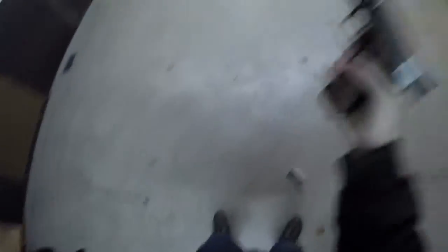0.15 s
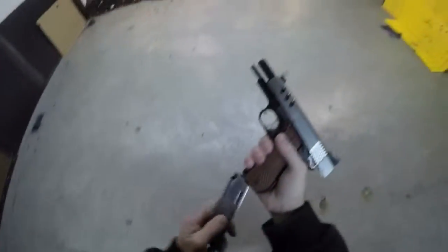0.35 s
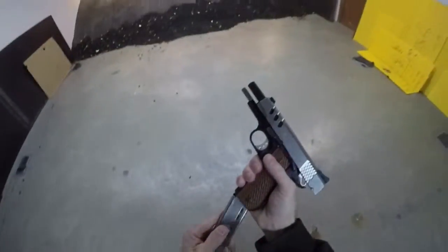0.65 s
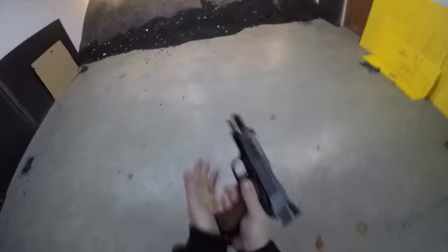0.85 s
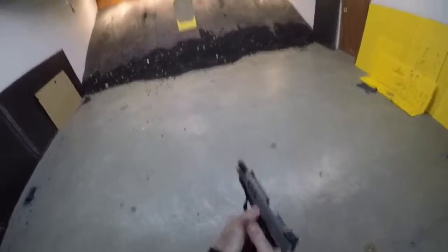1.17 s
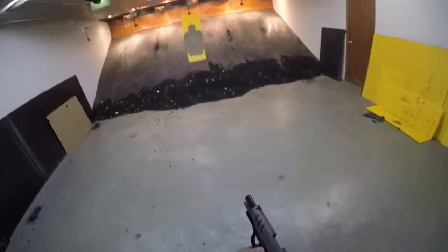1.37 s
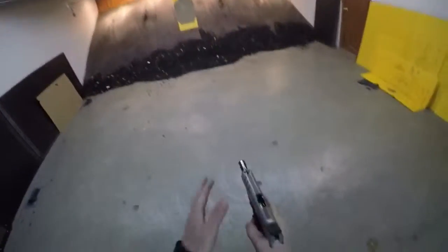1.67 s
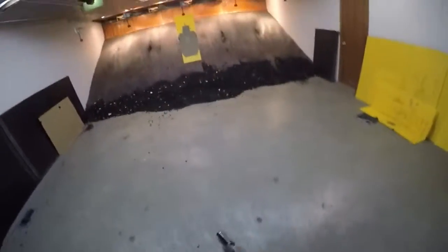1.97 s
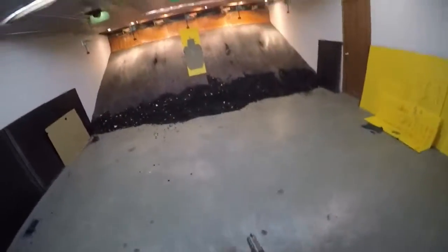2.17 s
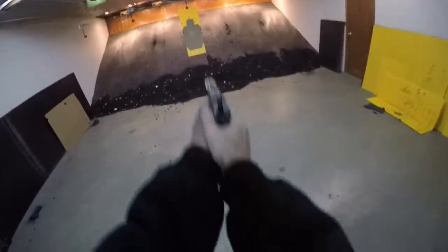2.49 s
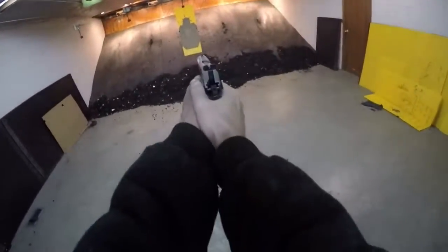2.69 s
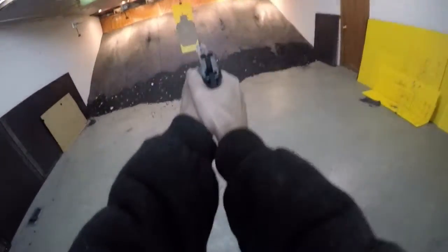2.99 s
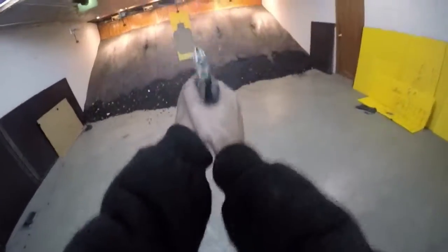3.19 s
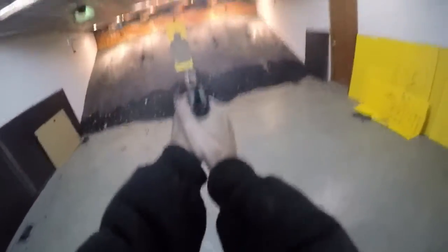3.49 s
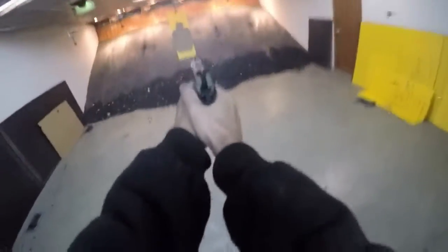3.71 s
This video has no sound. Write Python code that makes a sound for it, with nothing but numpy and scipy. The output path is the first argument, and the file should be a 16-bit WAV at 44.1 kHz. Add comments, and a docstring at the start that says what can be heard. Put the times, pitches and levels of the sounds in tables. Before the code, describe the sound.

Four loud pistol shots boom and echo in an indoor range after a clattering reload

```python
"""Concrete indoor range, microphone at the shooter's head: a pistol is reloaded and fired four times.
Background: duct rumble, air rush and fan lines under a written level curve that ducks at the first shot.
An empty magazine clatters on the floor, mostly heard through the room; close by, a full one is slapped
home and the slide slams shut: noise bursts through resonances, plus fading modes. A spent case rings faintly.
Each shot is a noise crack and a pressure wave that overload the microphone, then the same wall echoes."""
import sys
import numpy as np
from scipy import signal
from scipy.fft import rfft, irfft, next_fast_len
from scipy.io import wavfile
from scipy.ndimage import map_coordinates

SR = 44100
rng = np.random.default_rng(int(sys.argv[2]) if len(sys.argv) > 2 else 0)


def int16_out(signal):
    """Quantize to a 16-bit WAV file."""
    q = np.round(np.clip(np.atleast_2d(signal).T, -1, 1) * 32767)
    wavfile.write(sys.argv[1], SR, q.astype(np.int16))


N = 169785

# Background level as the recorder's automatic gain rises, then ducks at the first shot,
# written as a level curve: [t/s, rumble level/dB, air rush level/dB]
BACKGROUND_LEVELS = [(0, -51.5, -62.5), (.3, -52.5, -66.5), (.6, -43.5, -57.5), (1, -39, -51),
                     (1.5, -36.5, -50.5), (2.1, -36, -50.5), (2.7, -36.5, -51.5), (2.93, -36, -50.5),
                     (2.97, -70, -99.5), (3.85, -61, -48)]
# Colour of the duct rumble, then of the air rush: [f/Hz, relative level/dB]
RUMBLE_SPECTRUM = [(12, -30.5), (20, 0.5), (59, 2), (92, -10), (124, -7), (169, -10), (260, -32.5),
                   (340, -58.5), (570, -120)]
AIR_SPECTRUM = [(140, -37.5), (230, -5), (344, -5), (488, -5), (523, -14.5), (838, -22), (1320, -25),
                (1490, -26.5), (7450, -39.5), (8280, -39), (8720, -42.5), (15000, -47)]
# Steady fan lines: [f/Hz, level over the air rush/dB]
FAN_LINES = [(123.8, -3), (403.7, -15.5), (484.5, -3.5)]
FAN_WAVER_RATE, FAN_WAVER = 4, .25  # knots a second, depth

# Spent case rolling on the floor: [t/s, lower mode level/dB, upper mode level/dB]
CASE_LEVELS = [(0, -96, -92), (.1, -90, -88), (.43, -78, -80), (.49, -67, -60), (.54, -76, -74),
               (.645, -88, -83), (.67, -48, -69), (.72, -50.5, -60), (.82, -56, -64), (.87, -79, -77.5),
               (1.24, -93, -73.5), (1.334, -59, -81), (1.44, -76, -72), (1.528, -56, -77),
               (1.7, -65.5, -75), (1.85, -89, -100)]
# The two modes of the case: [f/Hz], lower and upper
CASE_MODES_HZ = [7994, 11950]
CASE_WAVER_RATE, CASE_WAVER = 30, .5  # knots a second, depth

# Empty magazine bouncing on the floor:
# [t/s, level/dB, t60/s, tilt/dB per octave, room level relative to the contact/dB]
MAGAZINE_BOUNCES = [(.136, -32.5, 0.13, 4.5, 3), (.143, -28, .03, 5.5, 3), (.152, -30, 0.063, -.5, 3),
                    (.159, -23, 0.026, -0.5, -3), (.200, -34, .03, -4.5, 1), (.276, -29.5, 0.031, 0, 2),
                    (.293, -27.5, .025, -.5, 2), (.299, -28, .02, -.5, 2.5), (.310, -29.5, .03, -.5, 4)]
# Resonances of the hollow steel box: [f/Hz, relative level/dB]
MAGAZINE_SPECTRUM = [(150, -12.5), (380, -8), (800, -26), (1500, -14.5), (2100, -9), (2500, 2),
                     (2850, -0.5), (3300, -12), (4300, -8), (4900, -3), (6200, -18.5), (11000, -21.5),
                     (13500, -14), (15000, -20.5)]
# Ringing modes of the box: [f/Hz, relative level/dB, t60/s]
MAGAZINE_MODES = [(2500, -1, 0.47), (2778, -9.5, 0.471), (4775, -9, .45), (5190, -10, .4)]
MAGAZINE_RING_DB = -12.5  # relative to each bounce

# Steel contacts in the gun, then the full magazine driven home; columns as for the bounces:
# [t/s, level/dB, t60/s, tilt/dB per octave, room level relative to the contact/dB]
GUN_CLICKS = [(.035, -48.5, .01, 3, -1), (.039, -57, .02, 4, -2), (.0615, -41.5, 0.01, -6, -1),
              (.074, -48, 0.023, 7, -5), (.4285, -26.5, 0.019, 0.5, -3), (.6112, -19, .012, -0.5, -7.5),
              (.6124, -21, 0.0075, -2, -4), (.6175, -40, .015, 5, -7.5), (.667, -36.5, .02, -3, 0),
              (.790, -46, 0.032, -4.5, -10.5), (.810, -34.5, 0.013, -4.5, -1), (.850, -44.5, 0.1, -3, -1.5),
              (.8566, -37.5, .03, -2, 0), (.8615, -31.5, 0.035, -6.5, 1), (.880, -18.5, 0.028, 2, 6.5),
              (1.268, -48.5, .03, 2.5, 6.5), (1.392, -50, 0.033, 5, 4), (1.514, -40, 0.024, -3, -1),
              (1.545, -48.5, .03, -4.5, -4), (1.926, -46.5, .04, -4, 5.5), (1.968, -46.5, .04, -5.5, 3.5),
              (2.003, -30.5, .015, -0.5, -16), (2.0116, -11, 0.016, 1, -3.5), (2.018, -23, 0.017, 3, -1.5),
              (2.033, -29.5, 0.031, 2.5, -2.5), (2.047, -30, 0.028, 12, -9.5),
              (2.106, -20, 0.095, -0.5, -4), (2.113, -16, .012, -1, 1), (2.1178, -11.5, 0.043, 1, -22),
              (2.1265, -9.5, 0.036, 7, -1.5), (2.1295, -5.5, 0.015, -2, -1), (2.132, -12.5, 0.033, 10, 1.5)]
MAGAZINE_SEATING = [(0.8927, -3, .016, 0, -11.5), (0.8944, -3, 0.017, 0, -10.5),
                    (.8995, -15.5, .02, 0.92, -5)]
# Resonances of the gun's steel, then of the grip: [f/Hz, relative level/dB]
STEEL_SPECTRUM = [(100, -18), (250, -1.5), (400, 3), (600, -10), (1200, -4.5), (1700, -2.5), (2250, 4.5),
                  (2900, 4), (3500, -3.5), (4700, 5), (5800, -2), (7000, -13.5), (8300, -12.5),
                  (10500, -22), (12500, -20), (15000, -22)]
GRIP_SPECTRUM = [(60, -0.5), (250, -13), (600, -30), (1150, -11.5), (1550, -33.5), (2200, -2.5),
                 (2750, -4.5), (3400, -14), (4100, -8.5), (4600, 3), (5300, -3), (6200, -11.5),
                 (7000, -21.5), (10500, -29.5), (15000, -23)]
# Modes of the frame as the magazine seats, then of the slide: [f/Hz, relative level/dB, t60/s]
FRAME_MODES = [(1803, 18, 0.11), (2218, -12, 0.49), (3580, -7, 0.36), (3957, -1, 0.36), (4414, -15.5, 0.36),
               (5184, -7, 0.26), (7790, -17, 0.99)]
SLIDE_MODES = [(2030, -4.5, .6), (2160, -1.5, 0.53), (2545, -7, 0.52), (4587, -12, .25), (6718, -5, .25),
               (9700, -14, .3)]
FRAME_RING_DB = -44.5
SLIDE_SHUT_S, SLIDE_RING_DB = 2.13, -28.5
# Dull knocks of the gun in the hand: [t/s, level/dB, f/Hz, t60/s]
HAND_KNOCKS = [(.4285, -34.5, 1150, 0.021), (.634, -37.5, 410, .15), (.8928, -24.5, 70, 0.081),
               (2.1295, -22, 391, 0.078)]

# The range's answer to small sounds: [f/Hz, relative level/dB, t60/s]
SMALL_SOUND_ROOM = [(100, -17, 0.47), (400, -2, .9), (1000, -2, 0.67), (2400, 2.5, 0.57), (5230, 1, 0.5),
                    (9000, 8.5, 0.41), (15000, 0.5, 0.55)]
ROOM_RISE_S = 0.0027
BOUNCE_S, BOUNCE_DB = .0062, -19  # one return from the nearest surface
CLUSTER_DB, CLUSTER_RATE = 1, 250  # scale of the reflections' level wander, knots a second

# The shots: [t/s, level/dB, extra pressure wave level/dB, extra crack level/dB]
SHOTS = [(2.9498, 3.5, 1.5, 13), (3.2226, -0.5, -1, 5), (3.4288, -1.5, -3, 1.5), (3.6018, 0.5, -4, -0.5)]
# Colour of the crack: [f/Hz, relative level/dB]
CRACK_SPECTRUM = [(200, 4.5), (1200, -6), (2400, 3.5), (3600, -7), (5500, -10.5), (8000, -19), (15000, -38)]
CRACK_DB, CRACK_WIDTH_S = -3.5, 0.00054
CRACK_ECHO_S, CRACK_ECHO_DB = 0.0043, -9
PUSH_DB, PUSH_AT_S, PUSH_WIDTH_S = 1.5, .0036, .0014
SUCTION_DB, SUCTION_AT_S, SUCTION_RISE_S = -3.5, .0066, .0033
# The hall's answer to a shot, then that of the near walls and ceiling: [f/Hz, relative level/dB, t60/s]
HALL_TAIL = [(30, -15.5, 0.32), (110, -7.5, .9), (179, -12.5, 0.54), (218, 0.5, 0.68), (254, -4.5, 0.76),
             (297, 0.5, 1.1), (358, -2, 1.33), (459, 1, 1.1), (534, -8.5, 1.5), (560, -5, 1),
             (700, -6, 0.55), (1010, -7, 0.76), (1390, -8, 0.61), (2690, -12, 0.53), (3500, -23, 0.57),
             (4660, -16.5, 0.52), (6600, -26.5, 0.44), (9900, -33, 0.42), (15000, -32, 0.39)]
NEAR_SCATTER = [(60, 1, 0.096), (156, -0.5, 0.2), (250, 2, .15), (504, -13.5, 0.29), (895, 5.5, 0.05),
                (1390, 6, 0.096), (2630, -9.5, 0.095), (5000, -17, 0.22), (8750, -32, 0.041),
                (15000, -39, 0.075)]
HALL_DB, HALL_RISE_S = -15.5, 0.002
SCATTER_DB, SCATTER_AT_S = -12.5, 0.011
# Standing waves between the walls: [f/Hz, level relative to the shot/dB, t60/s]
STANDING_WAVES = [(229.7, -26.5, 0.97), (342.3, -22.5, 0.74), (365.45, -21.5, 0.95), (404.3, -20.5, 0.74)]
STANDING_RISE_S = .03
# Booming echoes from the walls and the backstop: [delay t/s, level relative to the shot/dB]
WALL_ECHOES = [(0.0301, -13), (0.0525, -9), (.0739, -7.5), (0.107, -40)]
ECHO_HZ, ECHO_WIDTH_S = 367.4, 0.0017
ECHO_WAVE_DB = -20  # part of the pressure wave that each echo carries back
FLOOR_LAG_S, FLOOR_LOSS_DB = .0054, 2.5  # second, weaker arrival of each echo

CLIP_TOP, CLIP_HARDNESS = 1, 2.8
LOW_CUT_HZ, TOP_HZ = 8, 15350


def amp(db):
    """Amplitude factor of a level in dB."""
    return 10 ** (np.asarray(db) / 20)


def unit(x):
    """Scale to rms 1."""
    return x / np.sqrt(np.mean(x ** 2) + 1e-20)


def clock():
    """Time of every sample in seconds."""
    return np.arange(N) / SR


def along(points, hz):
    """Read (Hz, value) points on a log frequency axis."""
    f, values = np.transpose(points)
    return np.interp(np.log(hz + 1), np.log(f + 1), values)


def bell(t, width):
    """Gaussian pulse around t = 0."""
    return np.exp(-.5 * (t / width) ** 2)


def add(track, s, x):
    """Mix x into the track from time s on."""
    i = int(round(s * SR))
    track[i:i + len(x)] += x[:N - i]


def wobble(rate, size):
    """A smooth random curve through `rate` random knots a second."""
    knots = rng.standard_normal(int(size * rate / SR) + 4)
    return map_coordinates(knots, [np.arange(size) * rate / SR])


def noise(spectrum):
    """Coloured noise of rms 1."""
    size = next_fast_len(N)
    gain = amp(along(spectrum, np.fft.rfftfreq(size, 1 / SR)))
    return unit(irfft(rfft(rng.standard_normal(size)) * gain, size)[:N])


def tone(hz, rate, waver):
    """A line of rms 1 that wavers in level and phase."""
    phase = 2 * np.pi * hz * clock()
    in_phase = (1 + waver * wobble(rate, N)) * np.sin(phase)
    quadrature = waver * wobble(rate, N) * np.cos(phase)
    return unit(in_phase + quadrature)


def burst(envelope, count=6):
    """Noise under an envelope, its spectrum evened out by repeated flattening."""
    x = rng.standard_normal(len(envelope)) * envelope
    for _ in range(count):
        flat = irfft(np.exp(1j * np.angle(rfft(x))))
        x = np.sign(flat) * envelope
    return x


def ring(modes):
    """One second of struck modes, each a sine fading by 60 dB in its t60."""
    t = np.arange(SR) / SR
    return sum(amp(db - 60 * t / t60) * np.sin(2 * np.pi * hz * t) for hz, db, t60 in modes)


def body(spectrum, tilt=0, size=2048):
    """Causal impulse response of energy 1 with this spectrum, tilted above size / 2 Hz."""
    hz = np.fft.rfftfreq(size, 1 / SR)
    level = along(spectrum, hz) + tilt * np.log2(np.maximum(hz, size / 2))
    # Folding the cepstrum onto positive times gives minimum phase
    cepstrum = irfft(np.log(amp(level)))
    cepstrum[1:size // 2] *= 2
    cepstrum[size // 2:] = 0
    response = irfft(np.exp(rfft(cepstrum)))
    return response / np.linalg.norm(response)


def tail(table, size=512):
    """One second of clustered reflections, each frequency dying at its own speed."""
    table = np.array(table)
    white = irfft(np.exp(2j * np.pi * rng.random(SR // 2 + 1)))
    clusters = unit(white * amp(CLUSTER_DB * wobble(CLUSTER_RATE, SR)))
    hz, t, bins = signal.stft(clusters, SR, nperseg=size)
    t60 = along(table[:, ::2], hz)[:, None]
    fading = signal.istft(bins * amp(-60 * t / t60), SR, nperseg=size)[1]
    return signal.fftconvolve(fading, body(table[:, :2]))[:SR]


def contacts(rows, spectrum, size=4096):
    """Each contact is a short rattle through the part's resonances, with one bounce and a room tail."""
    out, t = np.zeros(N), np.arange(SR) / SR
    for s, db, t60, tilt, room_db in rows:
        rattle = burst(amp(-60 * t[:size] / t60))
        room = tail(SMALL_SOUND_ROOM) * (1 - np.exp(-t / ROOM_RISE_S))
        # The room's energy is set against the rattle's
        paths = amp(room_db) * room * np.linalg.norm(rattle) / np.linalg.norm(room)
        add(paths, 0, rattle)
        add(paths, BOUNCE_S, amp(BOUNCE_DB) * rattle)
        add(out, s, amp(db) * signal.fftconvolve(paths, body(spectrum, tilt)))
    return out


def ventilation():
    """Duct rumble, rushing air and wavering fan lines, under the written background level curve."""
    s, *levels = np.transpose(BACKGROUND_LEVELS)
    rumble_gain, air_gain = [amp(np.interp(clock(), s, db)) for db in levels]
    fan = sum(amp(db) * tone(hz, FAN_WAVER_RATE, FAN_WAVER) for hz, db in FAN_LINES)
    return rumble_gain * noise(RUMBLE_SPECTRUM) + air_gain * (noise(AIR_SPECTRUM) + fan)


def spent_case():
    """A brass case sings in two wavering modes as it rolls."""
    s, *levels = np.transpose(CASE_LEVELS)
    out = np.zeros(N)
    for hz, db in zip(CASE_MODES_HZ, levels):
        out += amp(np.interp(clock(), s, db)) * tone(hz, CASE_WAVER_RATE, CASE_WAVER)
    return out


def dropped_magazine():
    """The hollow steel box clatters and rings at every bounce, mostly heard through the room."""
    out = contacts(MAGAZINE_BOUNCES, MAGAZINE_SPECTRUM)
    box = ring(MAGAZINE_MODES)
    for s, db, *_ in MAGAZINE_BOUNCES:
        add(out, s, amp(db + MAGAZINE_RING_DB) * box)
    return out


def reloading():
    """Clicks and knocks; the frame rings as the magazine seats, the slide as it slams shut."""
    out = contacts(GUN_CLICKS, STEEL_SPECTRUM) + contacts(MAGAZINE_SEATING, GRIP_SPECTRUM)
    seated_s = MAGAZINE_SEATING[0][0]
    add(out, seated_s, amp(FRAME_RING_DB) * ring(FRAME_MODES))
    add(out, SLIDE_SHUT_S, amp(SLIDE_RING_DB) * ring(SLIDE_MODES))
    for s, db, hz, t60 in HAND_KNOCKS:
        add(out, s, ring([(hz, db, t60)]))
    return out


def pressure_wave(t):
    """The blast pushes the air in a bell-shaped pulse, then a slower suction follows."""
    u = np.maximum(t - SUCTION_AT_S, 0) / SUCTION_RISE_S
    push = amp(PUSH_DB) * bell(t - PUSH_AT_S, PUSH_WIDTH_S)
    return push - amp(SUCTION_DB) * u * np.exp(1 - u)


def hall_answer(t, lead, wave):
    """Diffuse tail, near scatter, standing waves and booming echoes that answer a shot at t = 0."""
    age = np.maximum(t, 0)
    hall = amp(HALL_DB) * tail(HALL_TAIL) * (1 - np.exp(-age / HALL_RISE_S))
    scatter_start = int((SCATTER_AT_S + lead) * SR)
    hall += amp(SCATTER_DB) * np.pad(tail(NEAR_SCATTER), (scatter_start, 0))[:SR]
    for hz, db, t60 in STANDING_WAVES:
        swell = 1 - np.exp(-age / STANDING_RISE_S)
        hall += amp(db - 60 * age / t60) * swell * np.sin(2 * np.pi * hz * age)
    for delay, db in WALL_ECHOES:
        hall += amp(db + ECHO_WAVE_DB) * np.interp(t - delay, t, wave)
        for lag, loss in ((0, 0), (FLOOR_LAG_S, FLOOR_LOSS_DB)):
            u = t - delay - lag
            hall += amp(db - loss) * bell(u, ECHO_WIDTH_S) * np.cos(2 * np.pi * ECHO_HZ * u)
    return hall


def shots():
    """Crack, pressure push and suction, then the hall: the same paths for every shot."""
    lead = .003  # s, room for the crack to rise before its peak
    t = np.arange(SR) / SR - lead
    wave = pressure_wave(t)
    hall = hall_answer(t, lead, wave)
    gate = bell(t, CRACK_WIDTH_S) + amp(CRACK_ECHO_DB) * bell(t - CRACK_ECHO_S, CRACK_WIDTH_S)
    gate_rms = np.sqrt(np.mean(gate ** 2))
    out = np.zeros(N)
    for s, db, wave_db, crack_db in SHOTS:
        crack = unit(noise(CRACK_SPECTRUM)[:SR] * gate) * gate_rms
        blast = amp(wave_db) * wave + amp(CRACK_DB + crack_db) * crack
        add(out, s - lead, amp(db) * (hall + blast))
    return out


def scene():
    """Background to main source, reaching both channels alike."""
    mono = ventilation() + spent_case() + dropped_magazine() + reloading() + shots()
    return np.array([mono, mono])


def record(dry):
    """The microphone saturates smoothly on the blasts; a low cut comes before, a band limit after."""
    x = signal.lfilter(*signal.butter(1, LOW_CUT_HZ, "high", fs=SR), dry)
    x = x / (1 + np.abs(x / CLIP_TOP) ** CLIP_HARDNESS) ** (1 / CLIP_HARDNESS)
    low_pass = signal.firwin(301, TOP_HZ, fs=SR, window="blackman")
    return signal.fftconvolve(x, low_pass[None], mode="same", axes=1)


dry = scene()
out = record(dry)
int16_out(out)
```